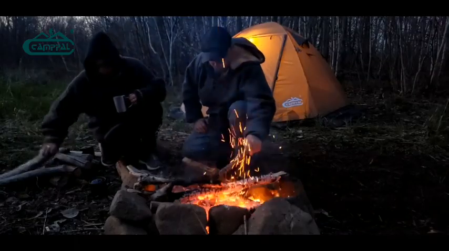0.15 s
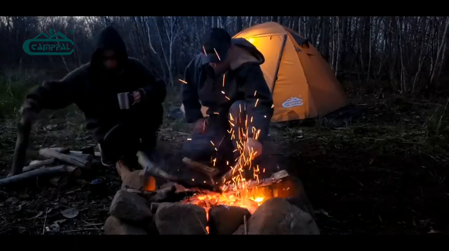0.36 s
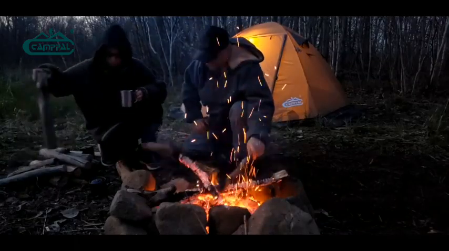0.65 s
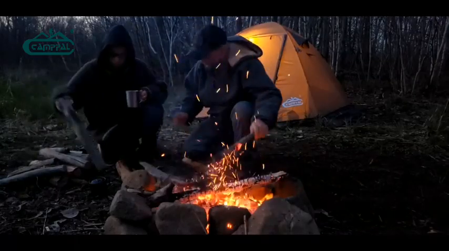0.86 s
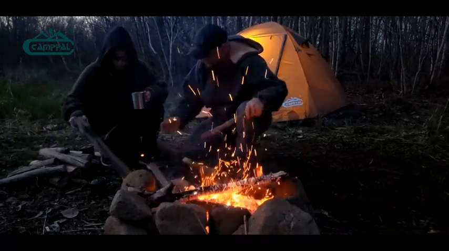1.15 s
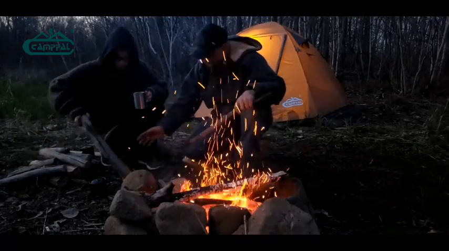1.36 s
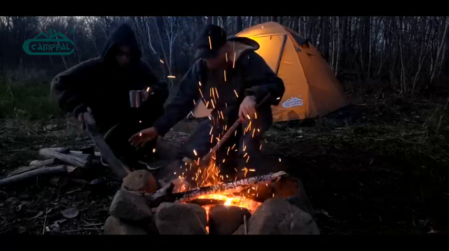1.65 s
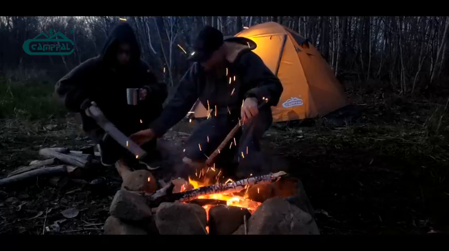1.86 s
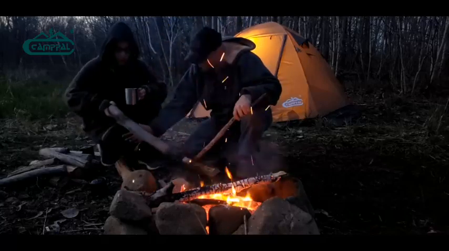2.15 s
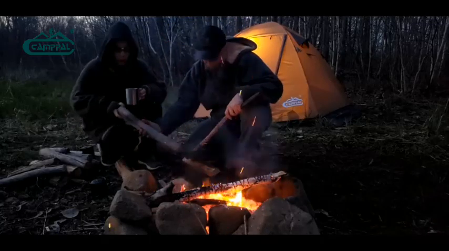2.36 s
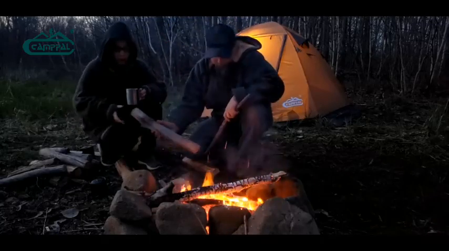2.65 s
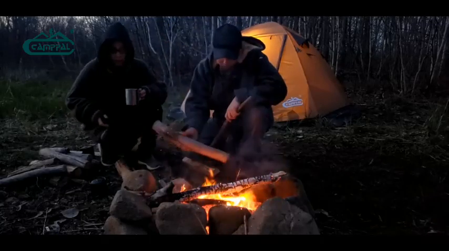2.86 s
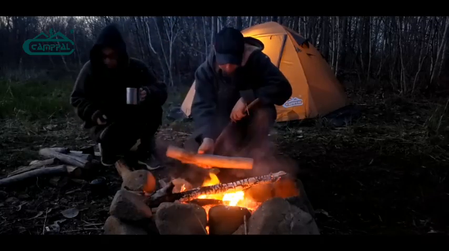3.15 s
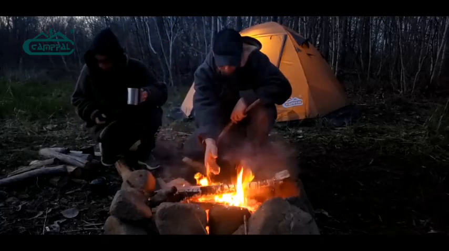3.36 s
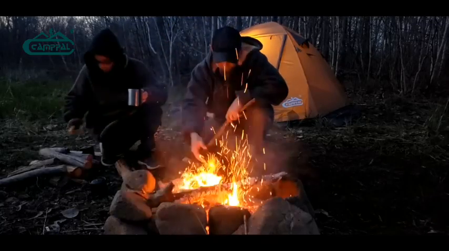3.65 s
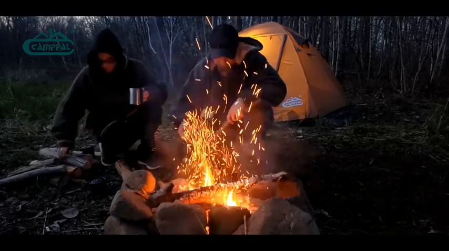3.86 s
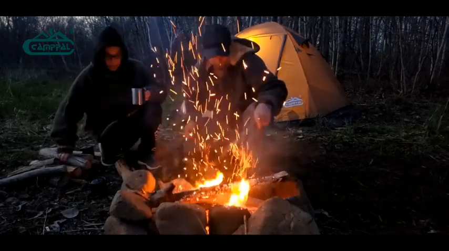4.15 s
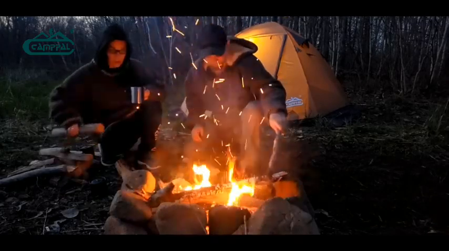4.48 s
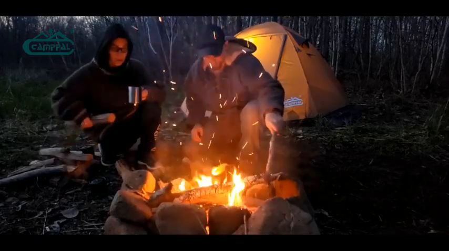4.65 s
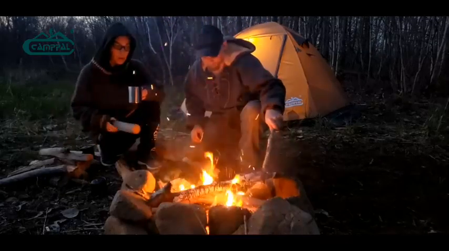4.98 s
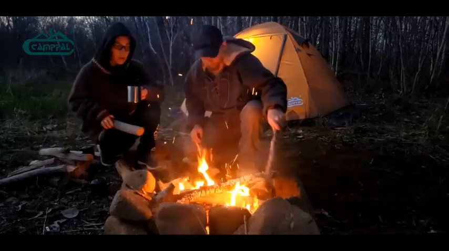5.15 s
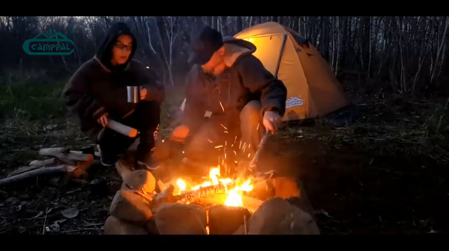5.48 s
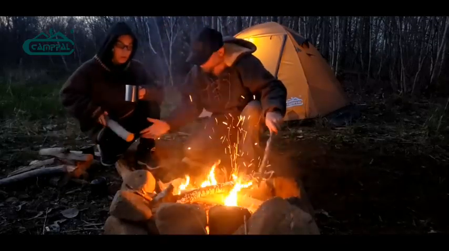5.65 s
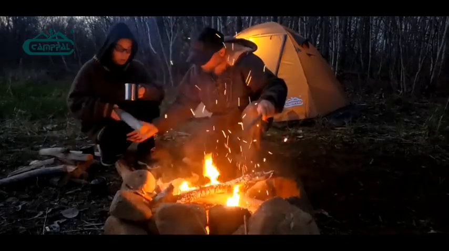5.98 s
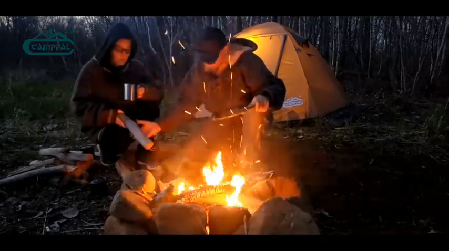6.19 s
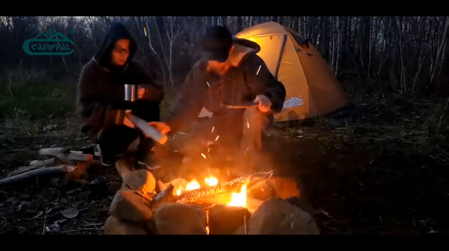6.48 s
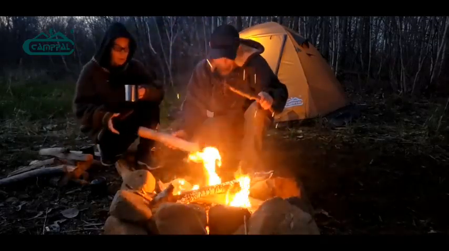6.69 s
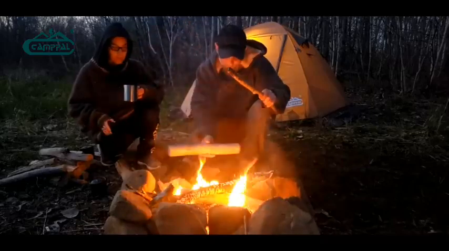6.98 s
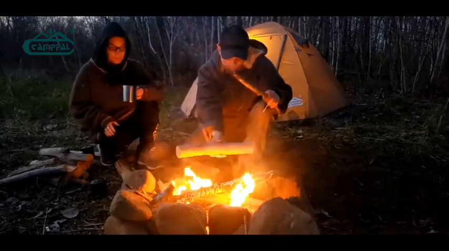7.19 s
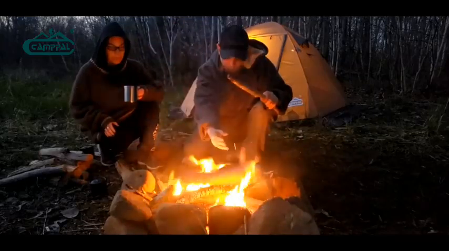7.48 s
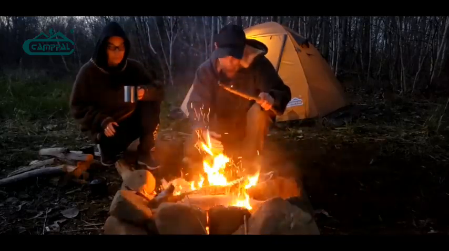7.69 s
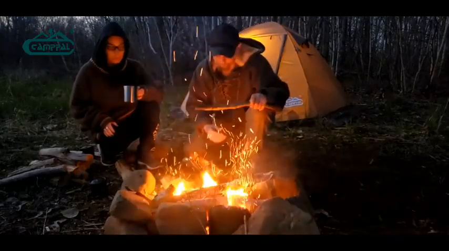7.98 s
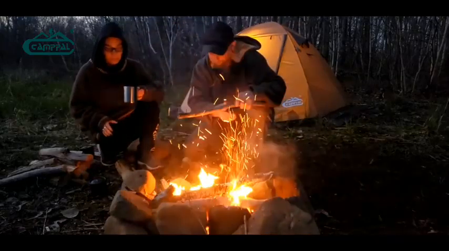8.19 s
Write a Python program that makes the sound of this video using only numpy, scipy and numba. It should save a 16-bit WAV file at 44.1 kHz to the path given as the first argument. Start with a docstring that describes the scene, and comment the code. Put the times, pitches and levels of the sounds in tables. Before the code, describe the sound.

Throughout about 8.3 seconds, hundreds of small frogs peep in a loud, continuous chorus: tenth-of-a-second whistles sliding up around 3 kHz, overlapping into a shrill shimmer with woodland echo, nearer individuals poking out. Close and dry, a campfire is worked. From 0 to 1.4 s sticks knock and scrape, with a firm clunk at 0.4, a sharp crack at 0.8, knocks near 1.1 and rustling embers with many small snaps. From 1.5 to 3.3 it is mostly calm, with a minor snap near 2.2. At 3.4 to 3.6 a log lands with a low thud, woody knocks and crunching embers. A crisp pop comes at 4.4, lighter knocks and rustles from 4.6 to 5.6, then quiet. At 7.5 to 7.8 another log drops with loud cracks, thuds and crackle, then settles. Soft flame flutter continues underneath; a faint far bird whistles intermittently, clearest near 3.5, 6.1 and 7.4.

```python
"""Frog pond and campfire at dusk

Hundreds of small frogs peep, each about once a second: short whistles that slide up, built from four harmonics.
Close by, a campfire is stirred: logs knock (dying tones), bark and embers snap and rustle (bursts of rough noise).
Low flames flutter (noise with a wavering bass), and one far bird sings pure whistles (gliding sine tones)."""
import sys
import numpy as np
from scipy import signal
from scipy.fft import rfft, irfft, next_fast_len
from scipy.io import wavfile
from scipy.ndimage import uniform_filter1d
from numba import njit

SR = 44100
rng = np.random.default_rng(int(sys.argv[2]) if len(sys.argv) > 2 else 0)


def wav_out(sig):
    """Save sig, one row per channel (or a flat mono array), as 16-bit PCM at SR to the path in sys.argv[1]."""
    wavfile.write(sys.argv[1], SR, np.round(np.clip(np.atleast_2d(sig).T, -1, 1) * 32767).astype(np.int16))


def to_linear_factor(level_db):
    """Convert decibel levels (scalar or array-like) to linear amplitude factors."""
    exponent = np.asarray(level_db, float) / 20
    return 10 ** exponent


N = 367353  # length in samples

# Nearest frogs, levels before the frog colour: (middle t/s, middle f/Hz, level/dB)
NEAR_PEEPS = [(1.142, 2957, -22), (1.721, 2770, -20.5), (1.965, 2855, -19), (2.9, 2922, -16.5),
              (3.473, 2707, -21), (4.307, 2690, -20), (4.659, 2963, -19.5), (4.815, 3056, -19),
              (5.003, 2862, -18.5), (5.312, 2920, -17.5), (5.46, 2927, -16.5), (5.966, 2966, -16.5),
              (6.13, 2937, -16), (6.549, 2812, -17), (6.957, 3067, -17), (7.308, 3062, -22)]
# Crowd of frogs behind them, before the frog colour: (t/s, level/dB)
CROWD_LEVEL = [(0.0, -16.5), (5.4, -16), (5.68, -17.5), (8.33, -16)]
CROWD_HZ, CROWD_SPREAD_HZ, CROWD_SCATTER_DB = 3008, 180, 4.5
FROG_COUNT, CALLS_PER_FROG = 720, 12
PEEP_RISE_HZ, PEEP_S, PEEP_EVERY_S = 254.5, 0.102, 0.94  # typical peep
# First four harmonics of a peep; the second is the loud pitch: (level/dB)
THROAT_HARMONICS = [-30.5, 0.5, -38.5, -57.5]
# Tone colour of the frog chorus, falling away above 7 kHz: (f/Hz, level/dB)
FROG_COLOUR = [(2000, 0.5), (2500, -2.5), (3000, 0.5), (3400, -4.5), (3700, -6), (3950, 12), (4800, -0.5),
               (5150, -20.5), (6000, 4), (7000, 0), (9000, -41.5)]

# Logs knocked or dropped: (t/s, level/dB, loudest mode f/Hz, t60/s before each mode takes its share)
KNOCKS = [(0.071, -27, 1490, 0.059), (0.391, -13.5, 988, 0.1), (0.553, -17.5, 743, 0.034),
          (0.81, -21.5, 1516, 0.18), (0.971, -21.5, 230, 0.089), (1.075, -15.5, 1020, 0.04),
          (1.096, -18.5, 1475, 0.067), (1.336, -26, 225, 0.19), (1.628, -37, 1390, 0.12),
          (3.373, -23.5, 1020, 0.18), (3.419, -18, 1446, 0.13), (3.476, -18, 212, 0.12),
          (3.489, -20, 296, 0.13), (3.568, -23, 400, 0.061), (4.592, -25, 313, 0.059),
          (5.247, -24, 417, 0.032), (5.482, -22, 198, 0.064), (7.539, -31, 1320, 0.24),
          (7.555, -17, 350, 0.074), (7.702, -19.5, 646, 0.09), (7.736, -19.5, 200, 0.094),
          (7.818, -25.5, 276, 0.068)]
# Modes (ringing tones) of a log: (multiple of the loudest f, level/dB, share of the t60)
LOG_MODES = [(0.401, -5.5, 0.3), (0.999, 0, 0.71), (1.52, -10.5, 0.93), (2.1, -17.5, 0.8)]
# Dull thuds of a log on the ground: (t/s, level/dB, f/Hz, t60/s)
THUDS = [(0.232, -26.5, 94, .15), (1.389, -29, 103.6, 0.2), (3.41, -8, 97, 0.04), (3.476, -25, 141, 0.21),
         (4.681, -26, 100, .12), (7.574, -16, 94, 0.091), (7.766, -17, 97.5, 0.23)]
CRUNCH_DB, CRUNCH_T60_S, CRUNCH_LOW_HZ, CRUNCH_HIGH_HZ = -6, 0.14, 180, 1790  # bark crushed by a knock

# Snaps of bark and embers, before the band levels: (t/s, level/dB, extra bass level/dB, extra middle level/dB)
SNAPS = [(0.0064, -33, -6.5, -13), (0.035, -30, -8, -15), (0.0438, -38, -5, -11), (0.0538, -26, -2, -12),
         (0.076, -25.5, 0, 0), (0.0877, -24.5, -11, -8), (0.1091, -27, 4, -7), (0.1264, -37.5, 8, -2),
         (0.2404, -33.5, -11, -9), (0.2695, -28, -9, -6.5), (0.3086, -27.5, -4, -6),
         (0.367, -23.5, -19, -16), (0.3738, -24.5, -4, -7.5), (0.399, -24.5, 0, -9), (0.41, -26, -13, -13),
         (0.4402, -27, -18, -16), (0.4888, -30.5, -17, -14), (0.5046, -34.5, -14, -9),
         (0.5559, -30, 0, -12), (0.5735, -32.5, -17, -8), (0.607, -33.5, -12, -8),
         (0.6987, -32.5, -16, -13), (0.7409, -39, -12, -13), (0.814, -10, -3, -2.5),
         (0.8419, -30.5, -4, -6), (0.8791, -29.5, 0.5, 0), (0.8914, -25.5, -4, -8), (0.9667, -25.5, -3, -2),
         (1.073, -25, 5, -7), (1.0912, -31.5, -4, 4), (1.3306, -30, 7.5, 7), (1.4143, -35.5, -11, -7),
         (2.1515, -26.5, 2, 11.5), (3.3546, -31.5, -9, 0), (3.4216, -16.5, 4, 0.5), (3.4276, -17, 3, 0.5),
         (3.475, -30.5, 5, 2), (3.482, -28.5, 2, 0), (3.534, -33, 4.5, -7), (3.5683, -36, 8, 1),
         (3.6205, -24, -14, -27), (4.3787, -14.5, -13.5, -8), (4.5182, -37.5, -12, -6),
         (4.594, -25.5, -12, -18), (4.744, -25.5, -24, -13), (5.0277, -32, -20, -2.5),
         (5.0995, -36.5, -12, -14), (5.1615, -26.5, -10.5, -9), (5.317, -40, -12, -10),
         (5.4836, -25.5, -4, -20), (5.5657, -30.5, -18, -13), (5.6086, -36.5, -14, -14.5),
         (6.5292, -39, -5.5, 1), (6.8611, -39, -12, -13), (7.2552, -31.5, -28, -21),
         (7.5375, -11.5, -13.5, -8), (7.5524, -26, 1, -2), (7.7036, -20.5, 4.5, -10),
         (7.7117, -19.5, -8, -5), (7.7371, -7.5, -14, -11.5), (7.7809, -31, -6, -11),
         (7.8226, -40.5, 8, -8), (7.8582, -36, -5, -7), (8.112, -37.5, -15, -19.5)]
# Bass, middle, treble and top of a snap: (low f/Hz, high f/Hz, level/dB)
SNAP_BANDS = [(198, 1320, 4.5), (1100, 4050, 12), (3900, 8850, 0.5), (8160, 15000, -10.5)]
SNAP_T60_S, SNAP_T60_DB_PER_DB = 0.042, 0.61  # for a snap listed at 0 dB; weaker ones are shorter
# Crumbs falling after a snap; they reach their full level once the stirring is this strong
DEBRIS_DB, DEBRIS_T60_S, DEBRIS_FULL_DB = -13, 0.12, -60

# Embers raked or shaken by a log, before the tick gain: (start t/s, length/s, level/dB)
STIRS = [(0.0, 0.19, -58), (0.36, 0.065, -52.5), (0.462, .17, -57.5), (0.662, .75, -60.5), (3.438, .2, -54),
         (4.494, 0.53, -71.5), (5.013, 0.12, -65.5), (5.15, .09, -56), (5.27, .05, -63), (5.53, 0.054, -60),
         (7.539, 0.091, -62), (7.699, 0.032, -52), (7.764, 0.08, -65.5)]
CALM_DB, STIR_ATTACK_S, STIR_T60_S = -74, 0.016, 0.3
# Tone colour of the embers: (f/Hz, level/dB per Hz)
EMBER_COLOUR = [(150, -3), (600, -7), (1500, 6.5), (5000, -2.5), (8000, -9), (11000, -14), (15500, -20.5)]
TICKS_OVER_RUSTLE_DB, GRAIN_DB = 12.5, -9.5  # grain is the fine even part between the flurries

# Far bird, one row a whistle, levels at its middle: (start t/s, length/s, low f/Hz, rise f/Hz, level/dB)
BIRD_WHISTLES = [(1.114, .2, 2120, 150, -51.5), (2.814, .3, 2287, 12, -52), (3.2, 0.18, 2130, 220, -51),
                 (3.5, 0.17, 2235, 150, -42.5), (3.64, .24, 2330, 11, -51.5), (4.419, 0.22, 2210, 200, -52),
                 (5.944, .11, 2075, 95, -51), (6.098, .36, 2083, 260, -43), (6.455, 0.19, 2230, 210, -50),
                 (7.402, .36, 2090, 205, -41), (7.833, 0.3, 2244, 140, -53)]
SLUR_FROM, SLUR_TO = 0.22, 0.85  # shares of a whistle between which the pitch slides up
BIRD_DROP_HZ, BIRD_DROP_S, BIRD_EDGE_S = 93, 0.011, 0.0082  # each whistle drops onto its low pitch
BIRD_SWELL_DB = 4  # from the start of a whistle to its end

# Echoes among the trees
WOODS_T60_S, FROG_ECHO_DB, BIRD_ECHO_DB = 0.72, -3, -4

# Tone colour of flames and evening air, before the overall level is set: (f/Hz, level/dB per Hz)
AIR_COLOUR = [(22, -36), (34, -20.5), (48, 13), (65, -5), (96, -0.5), (130, -10), (210, -7), (330, -17),
              (550, -20.5), (850, -16.5), (1200, -24), (2200, -21.5), (5000, -32), (7000, -46),
              (10000, -47.5), (15500, -67.5)]
AIR_DB, FLUTTER_DB, FLUTTER_TOP_HZ = -38, 4, 140


def colour(x, points):
    """Shape a sound's spectrum by (f/Hz, level/dB) points joined on a log frequency axis."""
    hz, db = np.transpose(points)
    size = next_fast_len(len(x), real=True)
    f = np.fft.rfftfreq(size, 1 / SR) + 1e-9  # avoids log(0)
    gain = to_linear_factor(np.interp(np.log(f), np.log(hz), db))
    return irfft(rfft(x, size) * gain, size)[:len(x)]


def set_rms(x, db):
    """Scale a sound to this average (rms) level in dB."""
    return x * to_linear_factor(db) / np.sqrt(np.mean(x ** 2))


def curve(rows):
    """Read a (t/s, value) table at every sample, with straight lines between rows."""
    return np.interp(np.arange(N) / SR, *np.transpose(rows))


def decay(t, t60):
    """Die away by 60 dB in t60 seconds."""
    return 1000. ** (-t / t60)


def walk(rate):
    """Random levels held for 1 / rate seconds and smoothed twice; spread near 1."""
    hold = int(SR / rate)
    steps = np.repeat(rng.standard_normal(N // hold + 1), hold)
    smooth = uniform_filter1d(uniform_filter1d(steps, hold), hold)
    return 1.17 * smooth[:N]


def grit(size, spread_db):
    """Noise whose samples differ widely in size, like many tiny fractures."""
    sizes = to_linear_factor(spread_db * np.minimum(rng.exponential(size=size), 6.5))
    return set_rms(rng.standard_normal(size) * sizes, 0)


def add(out, s, sound):
    """Mix a short sound in at time s, cutting off what falls outside the scene."""
    i = int(s * SR)
    part = sound[max(-i, 0):max(N - i, 0)]
    out[max(i, 0):max(i, 0) + len(part)] += part


def frogs():
    """Each frog keeps its pitch, distance and pace; the nearest calls stand out."""
    # One draw per frog, then one per call
    per_frog = rng.standard_normal((FROG_COUNT, 6, 1))
    pitch, nearness, pace, slope, long, first = per_frog.transpose(1, 0, 2)
    per_call = rng.standard_normal((FROG_COUNT, CALLS_PER_FROG, 3))
    late, detune, start = per_call.transpose(2, 0, 1)

    turn = np.arange(CALLS_PER_FROG) - 1 + 10 * first % 1
    s = turn * PEEP_EVERY_S * (1 + 0.12 * np.tanh(pace)) + 0.06 * late
    hz = CROWD_HZ + CROWD_SPREAD_HZ * np.clip(pitch, -2.9, 2.9) + 15 * detune
    gain = to_linear_factor(CROWD_SCATTER_DB * np.minimum(nearness, 1.3))
    stretch = 1 + 0.2 * np.tanh(long)
    rise_hz = PEEP_RISE_HZ * stretch * (1 + 0.12 * slope)
    columns = np.broadcast_arrays(s, hz, gain, rise_hz, PEEP_S * stretch, 10 * start)
    crowd = peeps(np.stack(columns, axis=-1).reshape(FROG_COUNT * CALLS_PER_FROG, -1))
    crowd = set_rms(crowd, 0) * to_linear_factor(curve(CROWD_LEVEL))

    near_rows = [(s, hz, to_linear_factor(db), PEEP_RISE_HZ, PEEP_S, 2 * np.pi * rng.random()) for s, hz, db in NEAR_PEEPS]
    return colour(crowd + peeps(np.array(near_rows)), FROG_COLOUR)


def peeps(rows):
    """Sing all rows at a third of the sample rate, enough for four harmonics, then bring them to full rate."""
    u = np.linspace(0, 1, num=512)
    # A peep swells and stops a little quicker
    swell = np.sqrt(2) * np.abs(np.sin(np.pi * u ** 1.206)) ** 0.81
    thin = 3
    sung = peep(np.zeros(N // thin + 1), SR / thin, rows, swell, to_linear_factor(THROAT_HARMONICS))
    return signal.resample_poly(sung, thin, 1)[:N]


@njit
def peep(out, rate, rows, swell, throat):
    """Sing rows (middle t/s, middle f/Hz, gain, rise f/Hz, length/s, phase): harmonics sliding up evenly."""
    out = out.copy()
    for r in range(len(rows)):
        middle, hz, gain, rise_hz, length, phase = rows[r]
        count = int(length * rate)
        first = int(middle * rate) - count // 2
        # z turns at half the loud pitch, so its second harmonic is the loud pitch
        z = np.exp(1j * phase)
        step = np.exp(1j * np.pi * (hz - rise_hz / 2) / rate)
        slide = np.exp(1j * np.pi * rise_hz / rate / count)
        for i in range(min(count, len(out) - first)):
            z, step = z * step, step * slide
            if first + i >= 0:
                # Powers of z are the harmonics
                wave = (z * (throat[0] + z * (throat[1] + z * (throat[2] + z * throat[3])))).imag
                out[first + i] += gain * swell[i * len(swell) // count] * wave
    return out


def logs():
    """Every knock rings the same set of modes, scaled by the size of the log, and crushes some bark."""
    out = np.zeros(N)
    t = np.arange(SR // 8) / SR
    bark = grit(len(KNOCKS) * len(t), spread_db=2).reshape(len(KNOCKS), -1) * decay(t, CRUNCH_T60_S)
    band = signal.butter(1, (CRUNCH_LOW_HZ, CRUNCH_HIGH_HZ), "bandpass", fs=SR, output="sos")
    for (s, db, hz, t60), crunch in zip(KNOCKS, signal.sosfilt(band, bark)):
        add(out, s, to_linear_factor(db + CRUNCH_DB) * crunch / np.abs(crunch).max())
        for multiple, mode_db, share in LOG_MODES:
            add(out, s, to_linear_factor(db + mode_db) * ring(multiple * hz, share * t60))
    for s, db, hz, t60 in THUDS:
        add(out, s, to_linear_factor(db) * ring(hz, t60))
    return out


def ring(hz, t60):
    """One dying mode; the push lasts about one of its cycles."""
    t60 = max(t60, 0.005)
    t = np.arange(int(t60 * SR)) / SR
    push = np.minimum(t * hz / 0.88, 1)
    return np.sin(2 * np.pi * hz * t) * decay(t, t60) * push


def snaps():
    """Ragged showers of splinters that start at once and die quickly, into crumbs if the fire is stirred."""
    out = np.zeros(N)
    filters = [signal.butter(3, b[:2], "bandpass", fs=SR, output="sos") for b in SNAP_BANDS]
    splinters = grit(len(SNAPS) * (SR // 10), spread_db=2).reshape(len(SNAPS), -1)
    t = np.arange(splinters.shape[1]) / SR
    crumb_gain = to_linear_factor(DEBRIS_DB) * np.minimum(stirring() / to_linear_factor(DEBRIS_FULL_DB), 1)
    for (s, db, bass_db, middle_db), noise in zip(SNAPS, splinters):
        t60 = SNAP_T60_S * to_linear_factor(SNAP_T60_DB_PER_DB * db)
        shower = 1000. ** -(t / t60) ** 1.4
        crumbs = crumb_gain[int(s * SR)] * decay(t, DEBRIS_T60_S)
        burst = noise * (shower + crumbs)
        # Bass and middle shares differ from snap to snap
        for sos, (_, _, band_db), extra_db in zip(filters, SNAP_BANDS, (bass_db, middle_db, 0, 0)):
            part = signal.sosfilt(sos, burst)
            add(out, s, to_linear_factor(db + band_db + extra_db) * part / np.abs(part).max())
    return out


def embers():
    """Fine dry ticks that come in quick flurries and stand well above the rustle between them."""
    flurries = set_rms(to_linear_factor(6 * walk(260) + 5 * walk(40)), 0) + to_linear_factor(GRAIN_DB)
    ticks = colour(grit(N, spread_db=4.5) * flurries, EMBER_COLOUR)
    return set_rms(ticks, TICKS_OVER_RUSTLE_DB) * stirring()


def stirring():
    """How strongly the embers rustle: each stir swells quickly just before its start, holds, and settles."""
    t = np.arange(N) / SR
    strength = np.full(N, to_linear_factor(CALM_DB))
    for s, length, db in STIRS:
        swell = np.clip((t - s) / STIR_ATTACK_S + 1, 0, 1)
        settle = decay(np.maximum(t - s - length, 0), STIR_T60_S)
        strength += to_linear_factor(db) * swell * settle
    return strength


def bird():
    """Pure whistles that hold a low pitch, slur up and hold the high one."""
    out = np.zeros(N)
    for s, length, hz, rise_hz, db in BIRD_WHISTLES:
        t = np.arange(0, length, 1 / SR)
        slur = np.clip((t / length - SLUR_FROM) / (SLUR_TO - SLUR_FROM), 0, 1)
        rise = rise_hz * np.sin(np.pi / 2 * slur) ** 1.6
        pitch = hz + rise + BIRD_DROP_HZ * np.exp(-t / BIRD_DROP_S)
        edge = np.clip(np.minimum(t, length - t) / BIRD_EDGE_S, 0, 1)
        gain = to_linear_factor(db + BIRD_SWELL_DB * (t / length - 0.5))
        whistle = np.sin(2 * np.pi * np.cumsum(pitch) / SR)
        add(out, s, np.sqrt(2) * edge * gain * whistle)
    return out


def woods(x, echo_db):
    """Add scattered echoes from the trees: a tail of noise that dies away."""
    t = np.arange(SR) / SR
    tail = rng.standard_normal(SR) * decay(t, WOODS_T60_S) * np.minimum(t / 0.056, 1)
    echoes = signal.fftconvolve(x, tail / np.linalg.norm(tail))[:N]
    return x + to_linear_factor(echo_db) * echoes


def air():
    """Low flutter of the flames over a faint steady hiss: noise whose bass wavers in level."""
    noise = rng.standard_normal(N)
    low = signal.sosfilt(signal.butter(1, FLUTTER_TOP_HZ, fs=SR, output="sos"), noise)
    flutter = to_linear_factor(FLUTTER_DB * walk(3.706)) - 1
    return set_rms(colour(noise + low * flutter, AIR_COLOUR), AIR_DB)


def scene():
    """Frogs and bird sound through the trees; the fire is close and dry."""
    pond = woods(frogs(), FROG_ECHO_DB)
    fire = logs() + snaps() + embers()
    song = woods(bird(), BIRD_ECHO_DB)
    return (pond + fire + song + air())[None]  # one channel


def roll_off(x):
    """The treble ends steeply here."""
    return signal.sosfilt(signal.butter(12, 16010, fs=SR, output="sos"), x)


def record(dry):
    """The recorder clips peaks just below full scale."""
    mix = np.clip(dry, -0.98, 0.98)
    return roll_off(mix)


dry = scene()
out = record(dry)
wav_out(out)
```